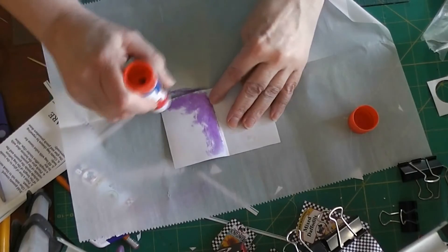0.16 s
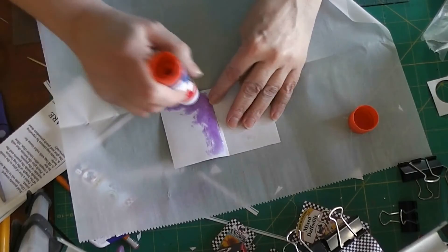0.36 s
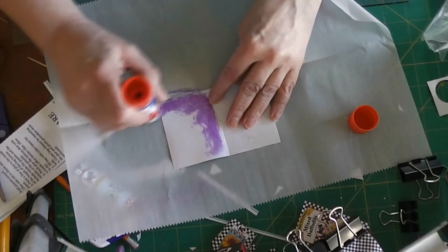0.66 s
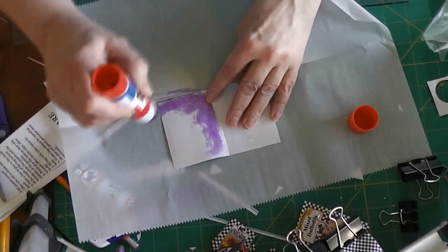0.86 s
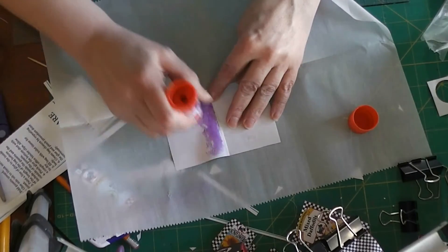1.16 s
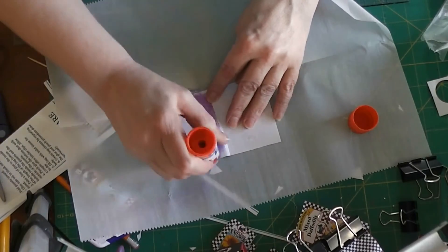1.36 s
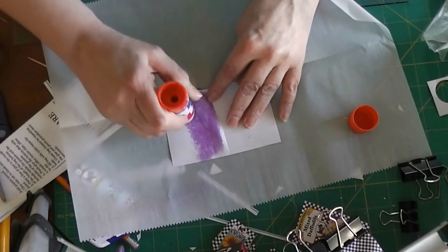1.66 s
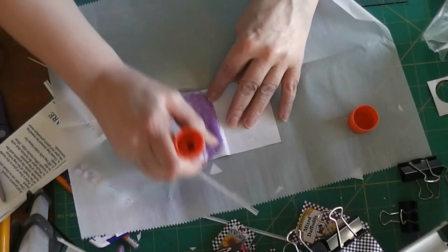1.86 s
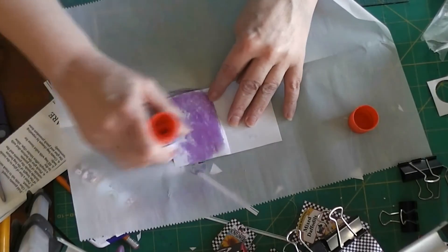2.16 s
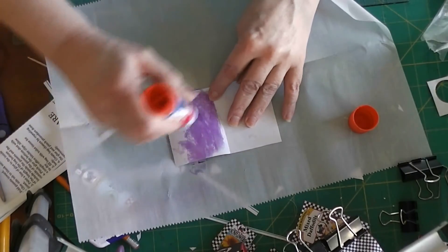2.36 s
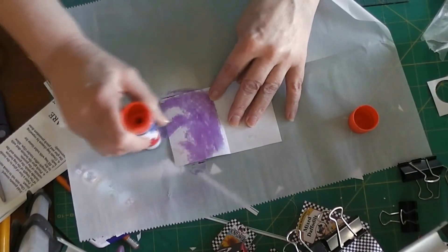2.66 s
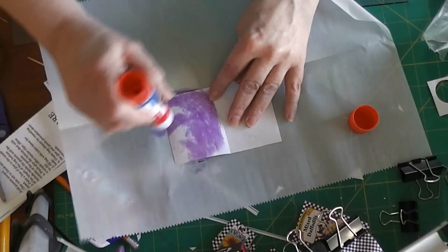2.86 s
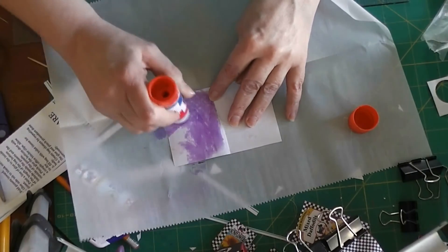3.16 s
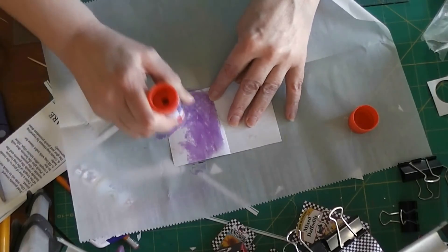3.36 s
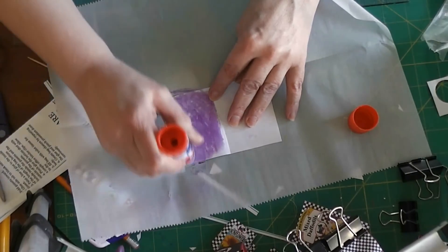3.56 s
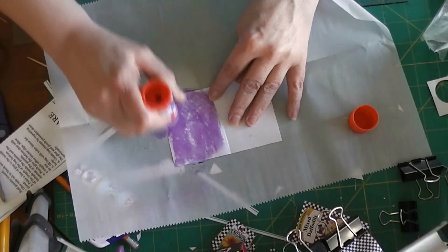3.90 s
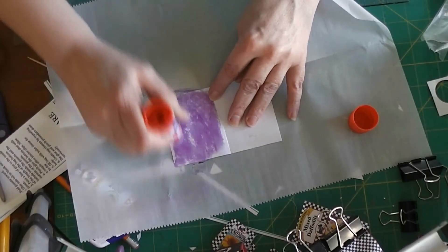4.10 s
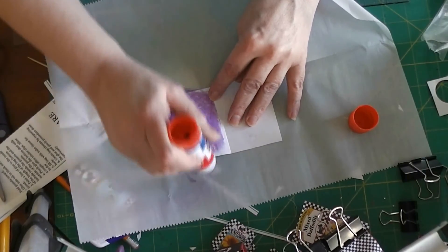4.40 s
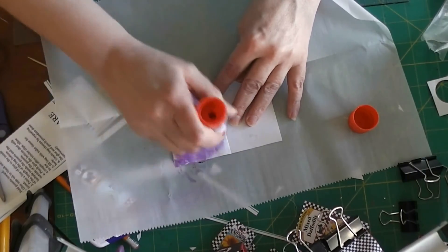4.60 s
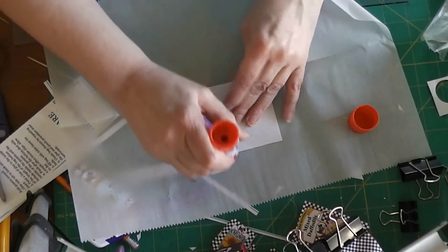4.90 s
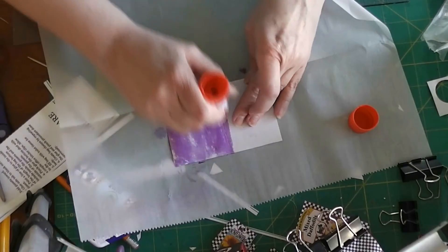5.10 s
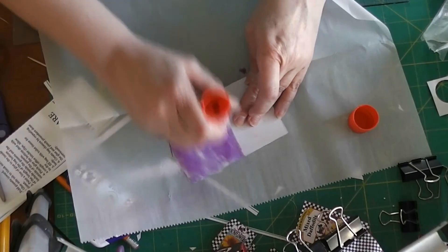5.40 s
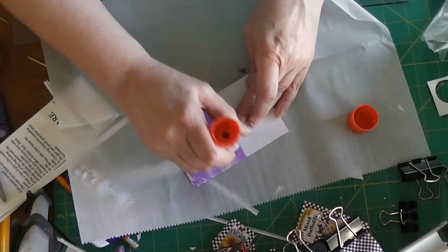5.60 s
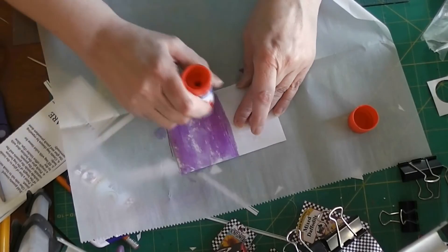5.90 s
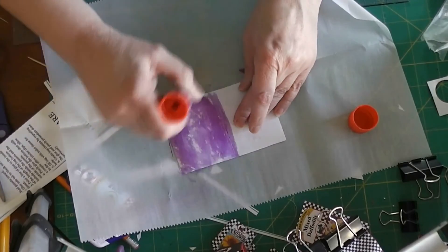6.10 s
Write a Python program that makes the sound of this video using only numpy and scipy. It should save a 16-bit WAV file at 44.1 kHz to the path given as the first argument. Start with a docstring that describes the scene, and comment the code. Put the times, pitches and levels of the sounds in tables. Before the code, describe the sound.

Short swishing rubs of a glue stick on paper, snapping creases and scuffs, occasional dull table thumps, faint low hum beneath, recorded close up.

```python
"""Glue stick on paper

A glue stick is dabbed and dragged over paper on a craft table, under a phone in a small quiet room.
Landings ring the table's modes; the glue's hiss and the sheet's drag are noise that follows the strokes.
Scuffs and snapping creases are bursts of noise in the paper's colour.
Under it all lie room reflections, hush of coloured noise and appliance hum of sines."""
import sys
import numpy as np
from scipy import signal
from scipy.fft import rfft, irfft
from scipy.io import wavfile
from scipy.ndimage import uniform_filter1d

SR = 44100
rng = np.random.default_rng(int(sys.argv[2]) if len(sys.argv) > 2 else 0)


def file_out(sig):
    """Save sig as 16-bit WAV at sys.argv[1]."""
    # one column per channel
    cols = np.atleast_2d(sig).T
    # limit, then scale
    lim = np.clip(cols, -1, 1)
    pcm = np.round(lim * 32767).astype(np.int16)
    wavfile.write(sys.argv[1], SR, pcm)


N = 275625
EARS = np.array([[1], [-1]])  # left, right


def undb(db):
    """Decibels to gain."""
    return 10 ** (np.asarray(db) / 20)


def colour(x, points, lo_hz=1., hi_hz=1e6):
    """Shapes white x by (Hz, dB) points between two soft edges; power is kept."""
    hz = np.fft.rfftfreq(N, 1 / SR) + 1
    at_hz, db = np.transpose(points)
    edges = np.sqrt((1 + (lo_hz / hz) ** 8) * (1 + (hz / hi_hz) ** 8))
    gain = undb(np.interp(np.log(hz), np.log(at_hz), db)) / edges
    return irfft(rfft(x) * gain / np.sqrt(np.mean(gain ** 2)), N)


def add(track, start_s, shape):
    """Lays a shape into each row of a track, no earlier than time zero."""
    i = int(max(start_s, 0) * SR)
    track[..., i:i + shape.shape[-1]] += shape[..., :N - i]


def grit(rate_hz, spread_db):
    """Gain that glides to a new random level rate_hz times a second; mean power 1."""
    step = int(SR / rate_hz)
    levels = np.repeat(rng.standard_normal(N // step + 1), step)[:N]
    gain = undb(spread_db * uniform_filter1d(levels, step))
    return gain / np.sqrt(np.mean(gain ** 2))


def zones(body_db, edge_db, middle_db, top_db):
    """Gains of the body, middle, edge and top zones; the middle leans on both body and edge."""
    middle = 0.31 * body_db + 0.71 * edge_db + middle_db
    return undb([body_db, middle, edge_db, edge_db + top_db])


# Landings of the stick. Each row: contact in seconds, peak in dB before panning, push length in ms,
# lead of the sheet's first touch in ms, crush body level in dB, snap level in dB.
THUMPS = [(0.5604, -7, 1.72, 14, -37, -18.5), (1.158, -10, 2.4, 9.2, -33, -11),
          (2.544, -10.5, 2.27, 21, -41.5, -27), (3.1757, -7.5, 1.73, 19, -33.5, -15.5),
          (4.697, -12, 2.48, 15.3, -42.5, -35)]
# Modes of table top and room. Each row: frequency in Hz, relative level in dB, T60 in seconds, sign.
TABLE_MODES = [(108, -32, .3, -1), (127, -20, .24, -1), (168, -17, .13, -1), (189, -29, .3, -1),
               (218, -13, .18, -1), (230, -12, .19, -1), (268, -21, .35, -1), (285, -10, .13, 1),
               (319, -4, .2, 1), (343, -25, .32, 1), (362, -10, .08, 1), (405, -9, .22, 1),
               (438, -15, .25, 1), (475, 0, .05, 1), (506, -4, .07, -1), (549, -21, .19, 1),
               (593, -6, .04, -1), (627, -13, .17, -1), (717, -8, .08, -1)]


def thumps():
    """A soft push rings the same modes each time; a longer push is duller."""
    t = np.arange(SR // 2) / SR
    ring = np.zeros(len(t))
    for hz, db, t60_s, sign in TABLE_MODES:
        ring += sign * undb(db) * np.sin(2 * np.pi * hz * t) * 1000 ** (-t / t60_s)
    out = np.zeros(N)
    for start_s, peak_db, push_ms, *_ in THUMPS:
        blow = np.convolve(ring, np.hanning(int(push_ms * SR / 1000)))
        add(out, start_s, undb(peak_db) * blow / np.abs(blow).max())
    return out


# Strokes of the stick. Each row: start in seconds, length in seconds, film drive in dB, sheet drive in dB.
STROKES = [(-.1, .33, -52.5, -57.5), (0.588, 0.2, -51, -50.5), (1.213, .22, -48, -57),
           (1.475, .16, -52, -60), (1.803, 0.22, -50, -54.5), (2.042, .26, -55.5, -56),
           (2.606, 0.13, -48.5, -56.5), (2.757, 0.23, -57, -46.5), (3.425, 0.22, -49, -61.5),
           (3.74, 0.2, -53.5, -66), (4.102, 0.25, -49.5, -55.5), (4.328, .2, -52.5, -54),
           (4.54, 0.12, -61, -70), (4.724, 0.21, -52.5, -60.5), (4.946, .2, -51.5, -59.5),
           (5.3, .32, -58, -54), (5.67, .24, -55, -65), (6.101, 0.1, -53.5, -58.5)]
STROKE_RISE_DB_PER_S, STROKE_FALL_DB_PER_S, STROKE_START_DB = 70, 258, -7


def strokes():
    """Film and sheet drive in dB: each stroke presses in, holds and lifts off."""
    t = np.arange(N) / SR
    power = np.full((2, N), 1e-10)
    for start_s, length_s, film_db, sheet_db in STROKES:
        press_db = np.minimum(STROKE_START_DB + STROKE_RISE_DB_PER_S * (t - start_s), 0)
        outside_s = np.maximum(np.maximum(t - start_s - length_s, start_s - t), 0)
        envelope = undb(press_db - STROKE_FALL_DB_PER_S * outside_s)
        power += np.outer(undb([film_db, sheet_db]), envelope) ** 2
    return 10 * np.log10(power)


# Colour of the glue hiss. Each row: frequency in Hz, relative density in dB per Hz.
GLUE = [(1650, -49), (2800, -38), (4090, -8.5), (5440, -14), (6520, -2.5), (7280, 0.5), (10800, -5.5),
        (14700, -17.5), (16000, -20)]
# Colour of the sheet, also played by paper(). Each row: frequency in Hz, relative density in dB per Hz.
PAPER = [(290, -11), (500, -4.5), (649, -11), (1030, -5), (1250, -4.5), (1620, -3.5), (3200, -8.5),
         (3750, -2.5), (4400, -2.5), (5710, -9.5), (6330, -3), (7750, -2.5), (10800, -9.5), (16000, -22.5)]


def smear():
    """The glue hisses in a bright band, wider the harder it is pressed; the dragged sheet crackles low."""
    film_db, sheet_db = strokes()
    band, wide, sheet, core = rng.standard_normal((4, N))
    # narrow whistle, comes and goes
    core = colour(core * undb(film_db - 11.5) * grit(6, 8.4), GLUE, 6800., 7400.)
    band = colour(band * undb(film_db - 7.0) * grit(90, 3.5), GLUE, 2800., 7200.)
    wide_db = film_db - 10.0 + 0.15 * (film_db + 43.0)
    wide = colour(wide * undb(wide_db) * grit(12, 2.1), GLUE, lo_hz=8440.)
    drag = colour(sheet * undb(sheet_db - 3.0) * grit(150, 6.3), PAPER, hi_hz=2470.)
    return band + wide + core + drag


# Scuffs of stick and fingers over the sheet. Each row: start in seconds, length before the fade in seconds,
# edge level in dB, body level in dB, top minus edge in dB.
SCUFFS = [(0, 0.015, -31.5, -41.5, -2.5), (0.121, 0.044, -51, -43.5, -5), (.815, 0.028, -51.5, -47, -21),
          (1.524, .023, -43, -47.5, -6.5), (1.628, .029, -54.5, -48.5, -10), (1.812, .025, -44.5, -50, -9),
          (2.086, 0.043, -38, -41.5, -6), (2.212, 0.024, -41.5, -41.5, 1), (2.251, .033, -57, -50, -22),
          (2.803, .01, -33.5, -34.5, -20), (2.817, .0065, -21, -30, -21), (2.826, 0.036, -40, -32, -16),
          (2.856, 0.046, -54, -38, -14), (2.938, 0.028, -55, -41.5, -19), (2.959, 0.065, -56.5, -45, -12),
          (3.591, .013, -49, -43, -13), (3.642, .052, -53.5, -38.5, -8), (4.263, .062, -58, -49, -15),
          (4.397, .025, -42, -44, -21), (4.922, .056, -59, -52, 0), (5.247, 0.06, -81, -51.5, -8),
          (5.343, 0.053, -80, -52, -12), (5.435, 0.054, -36, -53.5, -3), (5.525, 0.021, -43.5, -54, -8),
          (5.705, 0.058, -42, -51, -10), (5.788, 0.022, -39.5, -48, -8)]
SCUFF_RISE_SHARE, SCUFF_FADE_S, SCUFF_MIDDLE_DB = 0.41, 0.0092, -0.38
CRUSH_PEAK_S, CRUSH_HOLD_S = 0.0045, .012
CRUSH_MIDDLE_DB, CRUSH_EDGE_DB, CRUSH_TOP_DB = 3, -3.5, -12


def rubbing():
    """Drive of the paper zones by scuffs and landing crushes; the body crackles more than the edge."""
    rows = []
    for start_s, length_s, edge_db, body_db, top_db in SCUFFS:
        rise_s, hold_s = SCUFF_RISE_SHARE * length_s, (1 - SCUFF_RISE_SHARE) * length_s
        rows.append((start_s, rise_s, hold_s, body_db, edge_db, SCUFF_MIDDLE_DB, top_db))
    # a crush swells from first touch to just past the blow
    for start_s, _, _, early_ms, body_db, _ in THUMPS:
        early_s = early_ms / 1000
        rows.append((start_s - early_s, early_s + CRUSH_PEAK_S, CRUSH_HOLD_S,
                     body_db, body_db + CRUSH_EDGE_DB, CRUSH_MIDDLE_DB, CRUSH_TOP_DB))
    drive = np.zeros((4, N))
    t = np.arange(SR // 5) / SR
    for start_s, rise_s, hold_s, *levels_db in rows:
        fade = np.exp(-np.maximum(t - rise_s - hold_s, 0) / SCUFF_FADE_S)
        shape = np.minimum(t / rise_s, 1) ** 1.14 * fade
        add(drive, start_s, np.outer(zones(*levels_db), shape))
    coarse, fine = grit(200, 4.5), grit(300, 2.0)
    return drive * [coarse, np.sqrt(coarse * fine), fine, fine]


# Loudest creases snapping. Each row: start in seconds, middle level in dB before a common trim,
# body minus middle in dB, edge minus middle in dB.
TICKS = [(0.0819, -18.5, -6, -9), (0.1056, -38, -5, 10), (0.112, -30, 0, -1), (0.1402, -19.5, -7, 3),
         (0.1496, -29.5, 6, -1), (0.158, -18, -18, 0), (0.3357, -42.5, 12, -12), (0.624, -30, -6, -5),
         (0.6538, -31.5, -4, -6), (0.7377, -38, 1, 13), (0.7635, -31, -1.5, -5), (0.8257, -17.5, -3, 1.5),
         (1.3184, -29.5, 0, 3), (1.7885, -42, -6, 9.5), (1.8335, -24.5, -8, 3.5), (1.9226, -27, -17, 2),
         (1.941, -22.5, -5.5, -1), (1.9659, -21, -11.5, 7.5), (1.996, -27, -4.5, -19),
         (2.12, -27.5, -14, 14), (2.1804, -32.5, -6, -4), (2.2753, -27, -14, -4), (2.64, -36.5, 3, -14),
         (2.7514, -28.5, -18, 5), (2.7936, -26, -5, -9), (2.8316, -15, -21, -6), (2.866, -17, -5, 2.5),
         (2.896, -28, -6.5, 2), (2.9538, -20, -10, 0.5), (2.981, -34, 13.5, 4), (3.186, -15, -27.5, -5),
         (3.2487, -32.5, 1, -16), (3.407, -45, -13, 11), (3.488, -21.5, -7, -1.5), (3.5364, -29, -1, 12),
         (3.5949, -28, 0.5, -1), (3.652, -22.5, -14, 2), (3.671, -12.5, -14, 1.5), (3.6883, -13, -31, 2.5),
         (3.779, -33, -1, -19), (3.914, -27, -2, -11), (3.9342, -29, -14, -1), (4.106, -33, -5, -14),
         (4.1718, -41.5, 8.5, -3), (4.1992, -30, -5, 1), (4.2102, -25.5, -8.5, 6.5),
         (4.2704, -21, -6.5, -5), (4.3065, -29.5, 1.5, -14), (4.3206, -23.5, -18, -10), (4.367, -29, 3, -9),
         (4.4069, -16, -19, -3), (4.4295, -25, 1.5, 5.5), (4.899, -40, 4.5, 12), (4.9638, -25, -7, 3.5),
         (5.135, -50, 4, 10), (5.154, -48, 2, 17), (5.2663, -42, 11, -11), (5.3455, -32, 2.5, 7),
         (5.39, -34.5, -3, -11), (5.432, -38, -2, -9), (5.6223, -35, 6.5, -17), (5.9721, -38.5, 6, -1),
         (6.105, -37.5, 4.5, -5), (6.1259, -26.5, 7, 1), (6.157, -35, 3, 6)]
TICK_TRIM_DB, TICK_TOP_MINUS_EDGE_DB = -5.5, -8.5
TOUCH_DB, TOUCH_BODY_DB, TOUCH_EDGE_DB = -29, 2, -9
SNAP_S, SNAP_BODY_DB, SNAP_EDGE_DB = 0.0029, -10, 2.5


def creases():
    """Drive of the zones by snaps: loud ones, a dull touch and bright snap per landing, faint ones in strokes."""
    ticks = list(TICKS)
    for start_s, _, _, early_ms, _, snap_db in THUMPS:
        ticks.append((start_s - early_ms / 1000, TOUCH_DB, TOUCH_BODY_DB, TOUCH_EDGE_DB))
        ticks.append((start_s + SNAP_S, snap_db, SNAP_BODY_DB, SNAP_EDGE_DB))
    out = np.zeros((4, N))
    t = np.arange(SR // 25) / SR
    decay_s = 0.0022 * np.array([[1.3], [1], [.8], [.55]])  # treble settles first
    shape = (1 - np.exp(-t / (0.28 * decay_s))) * np.exp(-t / decay_s)
    for start_s, db, body_db, edge_db in ticks:
        zone_db = np.array([[body_db], [0], [edge_db], [edge_db + TICK_TOP_MINUS_EDGE_DB]])
        add(out, start_s, undb(db + TICK_TRIM_DB + zone_db) * shape)
    film_db, sheet_db = strokes()
    for when, size, tone in rng.random((170, 3)):
        i = int(when * (N - 1))
        snap_db = 4.5 - 2.56 * np.log(1 - size)  # many small, few large
        body_db = sheet_db[i] + snap_db - 9 * tone
        edge_db = film_db[i] + snap_db - 12 * (1 - tone)
        add(out, i / SR, np.outer(zones(body_db, edge_db, .1, -1.2), np.exp(-t / 0.0019)))
    return out


def paper():
    """Fibre noise in four zones of the sheet's colour: body, middle, bright edge, airy top."""
    noise = (rubbing() + creases()) * rng.standard_normal((4, N))
    edges_hz = [600., 2900., 5600., 10500., 20000.]
    return sum(colour(v, PAPER, lo, hi) for v, lo, hi in zip(noise, edges_hz, edges_hz[1:]))


ROOM_T60_S, ROOM_LATE_DB, ROOM_GLANCE_DB = 0.21, -13, -9


def room(x, t60_s=ROOM_T60_S):
    """Dense dull reflections, partly alike at both ears; glancing treble reaches the ears in opposition."""
    t = np.arange(SR // 2) / SR
    both, apart, glance = rng.standard_normal((3, len(t)))
    late = (both + 0.3 * apart * EARS) * 1000 ** (-t / t60_s) * np.minimum(t / 0.002, 1)
    late = signal.lfilter(*signal.butter(1, 7000., fs=SR), late)
    late = late / np.sqrt(np.sum(late ** 2) / 2)
    glance = signal.lfilter(*signal.butter(2, 6000., "high", fs=SR), glance) * np.exp(-t / .012)
    glance = EARS * glance / np.sqrt(np.sum(glance ** 2))
    tail = undb(ROOM_LATE_DB) * late + undb(ROOM_GLANCE_DB) * glance
    return signal.fftconvolve(x[None], tail, axes=1)[:, :N]


# Colour of the room air. Each row: frequency in Hz, relative density in dB per Hz.
HUSH = [(30, -17), (75, -10), (105, -0.5), (140, -8), (180, -1), (295, -6.5), (404, -10.5), (800, -13.5),
        (1500, -19), (2540, -30), (9000, -30), (16000, -32)]
HUSH_MID_DB = -54.5
# Appliance hum. Each row: frequency in Hz, RMS level in dB before panning, waver spread in dB.
HUM = [(101.1, -57.5, -1), (122, -61, 2), (178, -69, 1.5), (302.5, -68.5, 6)]
MAINS_HZ, MOTOR_HZ = 60., 58.76


def hush():
    """Room air and microphone hiss, alike in the bass and unrelated above, with wavering humming lines."""
    mid, side = rng.standard_normal((2, N))
    mid = colour(mid, HUSH)
    side = signal.lfilter(*signal.butter(1, 350., "high", fs=SR), colour(side, HUSH)) * undb(0.5)
    air = undb(HUSH_MID_DB) * (mid + side * EARS)
    turn = 2 * np.pi * np.arange(N) / SR
    hum = np.zeros(N)
    for hz, db, waver_db in HUM:
        hum += undb(db) * grit(4.01, waver_db) * np.sin(hz * turn + 7 * rng.random())
    # a motor slips just under the mains and beats with it; mains buzz on the left only
    hum -= undb(-65.5) * np.sin(MOTOR_HZ * turn)
    mains = undb(-53) * np.sin(MAINS_HZ * turn) + undb(-59) * np.sin(3 * MAINS_HZ * turn)
    lines = hum * undb(-.7 * EARS) + mains * np.array([[1], [0]])
    return air + np.sqrt(2) * lines  # RMS to peak


def scene():
    """Table a little to the right, ringing on longer in the room; more of the paper's treble at the left."""
    table = thumps()
    sheet = paper() + smear()
    treble = signal.filtfilt(*signal.butter(2, 6000., "high", fs=SR), sheet)
    direct = table * undb(-.7 * EARS) + sheet + 0.087 * EARS * treble
    reflected = room(sheet) + room(undb(-3) * table, t60_s=0.42)
    return direct + reflected + hush()


TOP_HZ = 15900


def record(dry):
    """The phone cuts the top with a steep low-pass."""
    return signal.sosfilt(signal.ellip(10, .2, 70, TOP_HZ, fs=SR, output="sos"), dry)


dry = scene()
out = record(dry)
file_out(out)
```